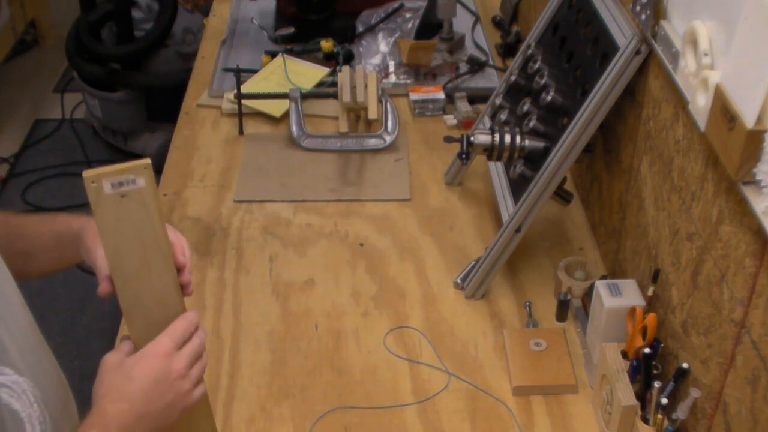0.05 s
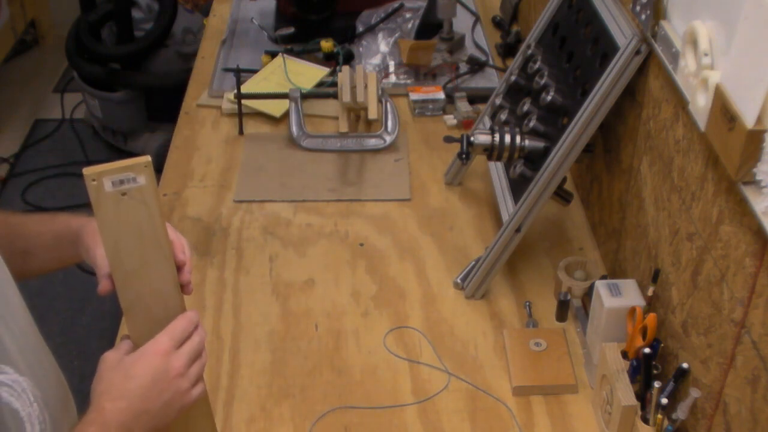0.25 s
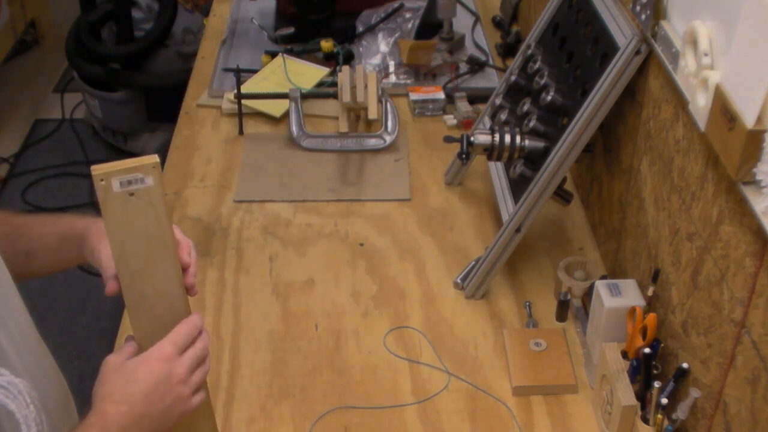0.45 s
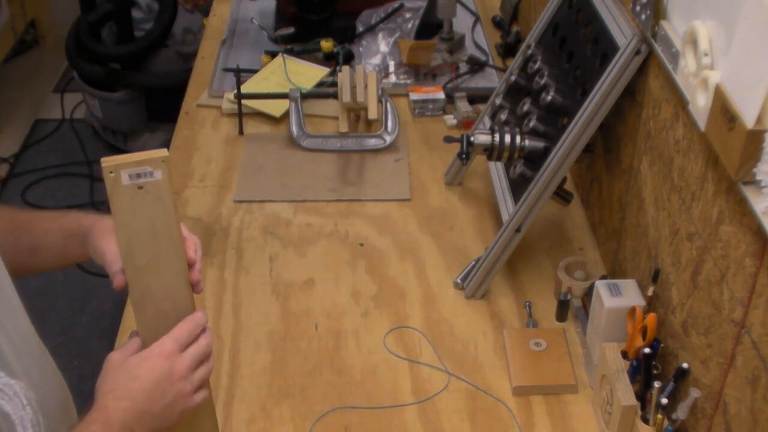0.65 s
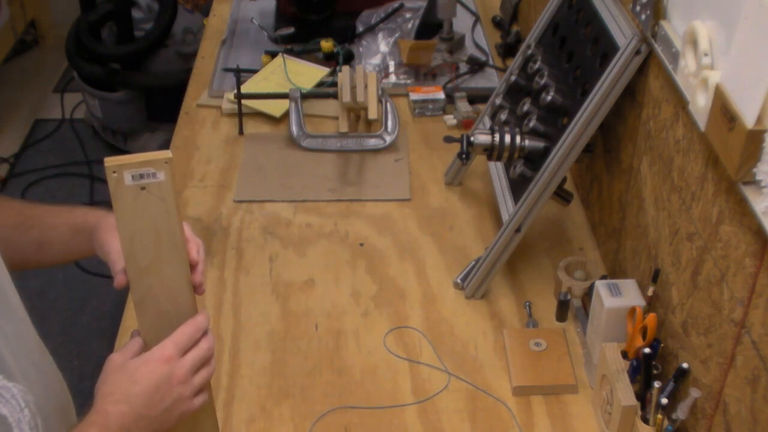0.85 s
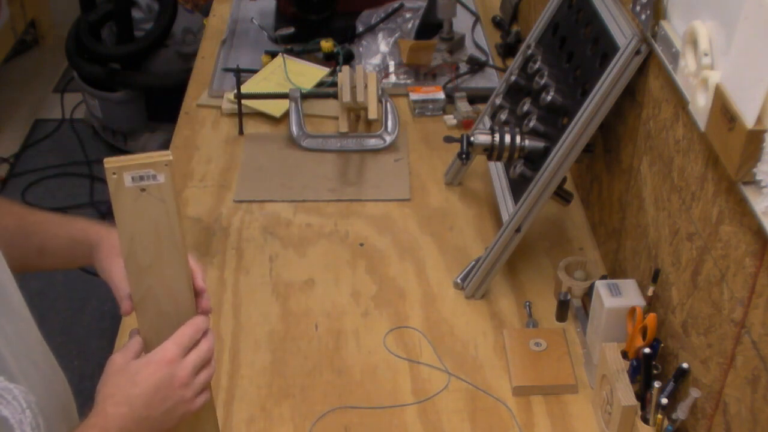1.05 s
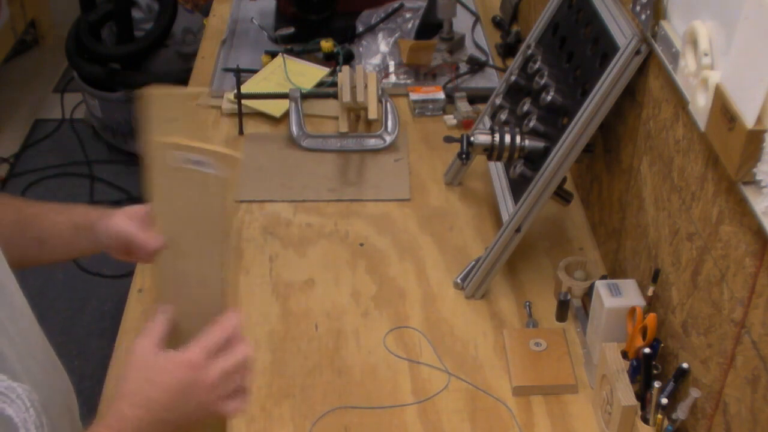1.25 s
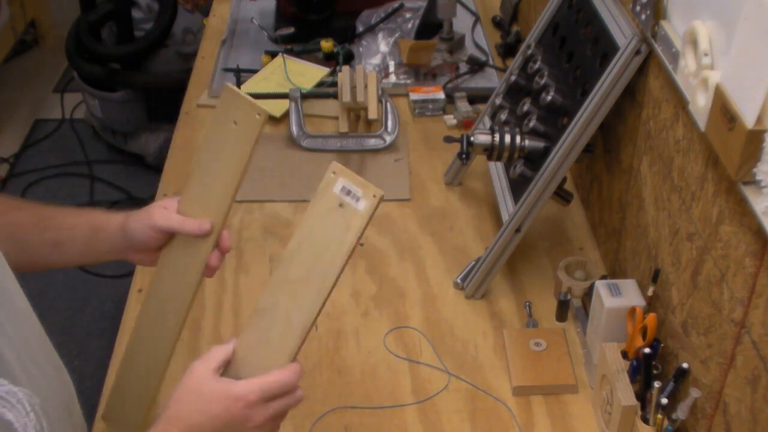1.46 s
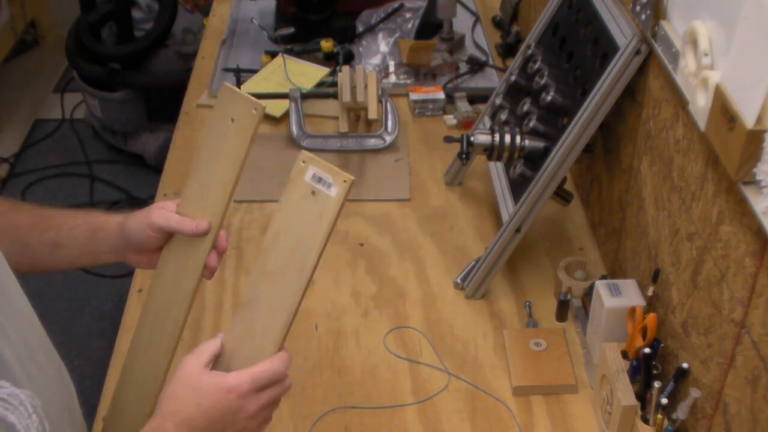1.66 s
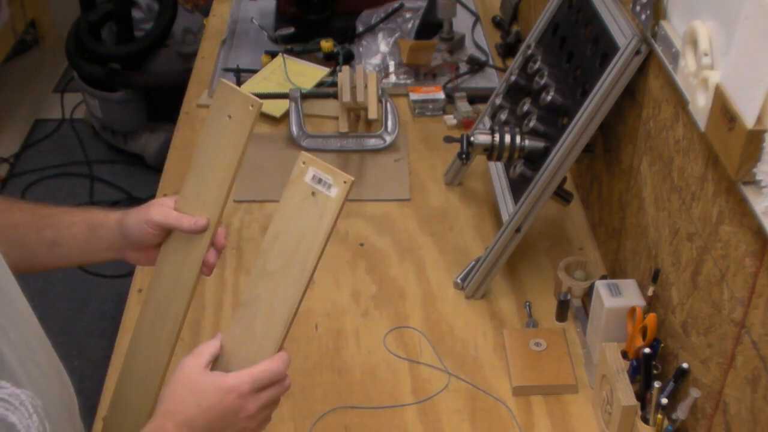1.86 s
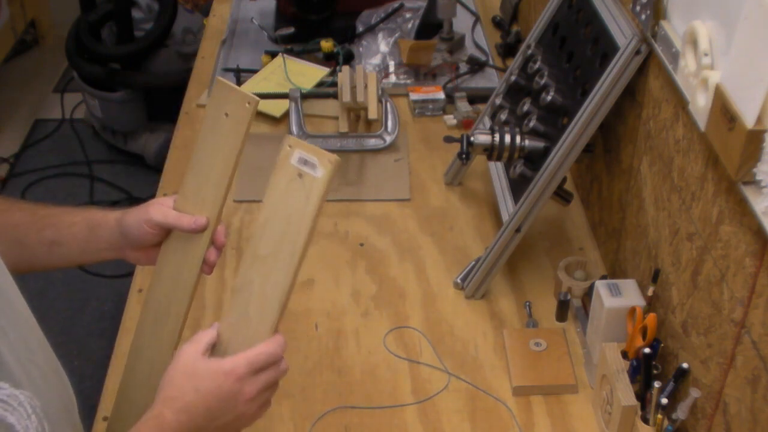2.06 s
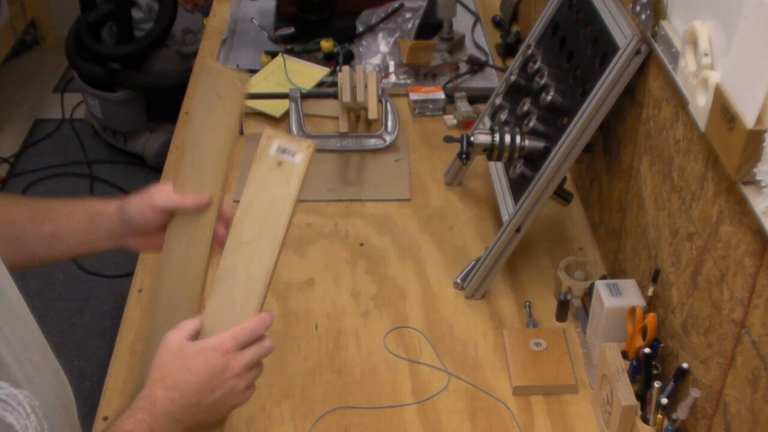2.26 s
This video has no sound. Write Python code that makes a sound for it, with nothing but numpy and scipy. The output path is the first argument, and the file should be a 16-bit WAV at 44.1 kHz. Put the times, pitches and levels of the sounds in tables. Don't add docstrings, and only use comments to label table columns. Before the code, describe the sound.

Two wooden boards clap hard at the very start, then two softer hollow knocks on a plywood bench follow; after a pause, they scuff and squeak faintly. Close microphone, small room, steady fan hum and hiss.

```python
import sys
import numpy as np
from scipy import signal
from scipy.fft import rfft, irfft, next_fast_len
from scipy.io import wavfile
from scipy.ndimage import map_coordinates

SR = 44100
rng = np.random.default_rng(int(sys.argv[2]) if len(sys.argv) > 2 else 0)


def invert_db(level):
    return 10 ** (np.asarray(level, dtype=float) / 20)


def wav_out(sig):
    wavfile.write(sys.argv[1], SR, np.round(np.clip(np.atleast_2d(sig).T, -1, 1) * 32767).astype(np.int16))


N = 101385
TIME = np.arange(N) / SR

# (frequency [Hz], correlation [1])
DIFFUSE_ALIKE = [(100, 0.9), (500, 0.98), (2000, 0.72), (8000, 0.067)]


def unit(x):
    return x / np.sqrt(np.mean(x ** 2) + 1e-20)


def noise(*shape):
    return rng.standard_normal(shape)


def along(points, hz):
    f, v = np.transpose(points)
    return np.interp(np.log(hz + 1), np.log(f + 1), v)


def filtered(x, response):
    m = next_fast_len(x.shape[-1] + 8192)
    hz = np.fft.rfftfreq(m, 1 / SR)
    return irfft(rfft(x, m) * response(hz), m)[..., :x.shape[-1]]


def high_passed(x, corner_hz):
    return filtered(x, lambda hz: (1j * hz / (corner_hz + 1j * hz)) ** 2)


def coloured(x, spectrum):
    return unit(filtered(x, lambda hz: invert_db(along(spectrum, hz))))


def paired(two, alike):
    def mid_side_gains(hz):
        angle = np.arccos(np.clip(along(alike, hz), -1, 1)) / 2
        return np.array([np.cos(angle), np.sin(angle)])

    mid, side = filtered(two, mid_side_gains)
    return np.array([mid + side, mid - side])


def ringing(modes, s, rise_s, bend=1):
    t = np.maximum(TIME - s, 0)
    ring = np.zeros(N)
    for k, (hz, db, t60) in enumerate(modes):
        decay = invert_db(db - 60 * (t / t60) ** bend)
        ring += (-1) ** k * decay * np.sin(2 * np.pi * hz * t)
    return ring * (1 - np.exp(-t / rise_s))


def swing(s, hz, time_s):
    t = np.maximum(TIME - s, 0)
    swell = (t / time_s / 2) ** 2 * np.exp(2 - t / time_s)
    return swell * np.sin(2 * np.pi * hz * t)


def dying(s, t60):
    return (TIME > s) * invert_db(-60 * np.abs(TIME - s) / t60)


def background():
    # (frequency [Hz], density [dB per Hz])
    hum_spectrum = [(25, -33), (60, -15.5), (160, -5), (225, -17.5), (330, -16.5), (450, -2), (800, -7),
                    (1100, -28.5)]
    air_spectrum = [(350, -42), (1200, 1), (2500, -4.5), (4200, -6), (5200, -6), (6300, -9), (7500, -107),
                    (9000, -56)]
    hiss_spectrum = [(200, -60), (1000, 10), (7000, 11), (12000, -33), (15700, 6)]
    # (frequency [Hz], width [Hz], rms level [dB])
    whine = [(60, 7, -62.5), (385, 47, -47.5), (505.5, 34, -51.5), (577, 11, -63.5), (661, 40, -56.5),
             (900, 30, -58), (1231, 2.7, -61), (5160, 320, -58)]
    steady = invert_db(-47.5) * coloured(noise(2, N), hum_spectrum)
    for centre, wide, db in whine:
        peak = lambda hz: 1 / (1 + ((hz - centre) / wide) ** 2) ** 1.2
        steady += invert_db(db) * unit(filtered(noise(2, N), peak))
    sway_db = 0.31 * map_coordinates(noise(40), [TIME * 12])
    air = invert_db(-50.5) * coloured(noise(2, N), air_spectrum)
    hiss = invert_db(-65) * coloured(noise(2, N), hiss_spectrum)
    return paired(steady * invert_db(sway_db) + air, DIFFUSE_ALIKE) + hiss


def fan_motor():
    motor_hz, rms_db = 267, -62
    return invert_db(rms_db) * np.sqrt(2) * np.sin(2 * np.pi * motor_hz * TIME)


def thud(s):
    # (frequency [Hz], density [dB per Hz])
    spectrum = [(220, -120), (320, -30), (400, -2.5), (650, -11), (900, -11.5), (1200, -42), (2200, -35),
                (3500, -120)]
    t60_s, rise_s = 0.19, 0.0021
    rise = 1 - np.exp(-np.abs(TIME - s) / rise_s)
    return coloured(noise(N), spectrum) * dying(s, t60_s) * rise


def boom(s):
    # (frequency [Hz], level [dB], t60 [s])
    bench = [(84, -4, 0.11), (152.4, -6.5, 0.16), (175.2, -10.5, 0.15), (205.7, -20.5, 0.21),
             (115.6, -20.5, 0.25)]
    return ringing(bench, s, rise_s=0.0033, bend=2.6)


def crack(s):
    # (frequency [Hz], density [dB per Hz])
    spectrum = [(600, -120), (1000, 6.5), (2500, -6.5), (6000, -15), (7500, -26.5), (10000, -19),
                (15500, -26), (16000, -120)]
    return coloured(noise(N), spectrum) * dying(s, t60=0.074)


def knocks():
    # (time [s], boards [dB], thud [dB], bench [dB], crack [dB])
    impacts = [
        (.0003, -9.5, -13, -15.5, -20),
        (0.1986, -18.5, -26, -24.5, -41),
        (0.36, -18, -23, -18.5, -33),
    ]
    # (frequency [Hz], time constant [s], level [dB])
    blows = [
        (397.7, 0.0033, -4),
        (518, 0.0013, -11.5),
        (478, 0.0012, -8),
    ]
    # (frequency [Hz], level [dB], t60 [s])
    clapped = [(381, 3.5, 0.086), (400, -10, 0.21), (453, -3.5, 0.15), (547.6, -5, 0.16),
               (635.3, -7.5, 0.18), (748, -14, .18), (817, -20.5, .15), (904, -33, 0.1), (1056, -36, 0.084),
               (1230, -31, .1), (1860, -35, 0.046), (2310, -42, .05)]
    loose = [(382, -2.5, 0.31), (398.5, -7.5, 0.18), (440, 1, 0.16), (522, -21, 0.067), (473.4, -21, 0.13),
             (554, -3.5, 0.13), (625, -10.5, 0.083), (780, -27, 0.091), (895, -16, 0.098), (1310, -36, .15),
             (1610, -19, .04), (2040, -22, 0.034)]
    tight = [(393.6, 1.5, 0.16), (418, 1, 0.13), (474, -26, 0.093), (540, -22, 0.095), (625, -8, 0.23),
             (658, -10, 0.11), (814, 1.5, 0.066), (807, -14, 0.17), (1185, -19, 0.17), (1720, -16, 0.037),
             (2094, -20, 0.034), (2460, -34, 0.036)]
    out = np.zeros(N)
    for impact, blow, modes in zip(impacts, blows, [clapped, loose, tight]):
        s, boards_db, thud_db, bench_db, crack_db = impact
        hz, blow_s, blow_db = blow
        out += invert_db(blow_db) * swing(s, hz, blow_s)
        out += invert_db(boards_db) * ringing(modes, s, rise_s=0.0013, bend=0.89)
        out += invert_db(thud_db) * thud(s)
        out += invert_db(bench_db) * boom(s)
        out += invert_db(crack_db) * crack(s)
    return out


def room(x):
    # (frequency [Hz], t60 [s])
    decay = [(80, 0.36), (500, 0.31), (2000, 0.38), (10000, 0.28)]
    hz, t, z = signal.stft(noise(2, SR // 2), SR, nperseg=256)
    tail = signal.istft(z * invert_db(-60 * t / along(decay, hz)[:, None]), SR, nperseg=256)[1]
    tail = paired(tail, DIFFUSE_ALIKE)
    tail = tail / np.linalg.norm(tail[0])
    delayed = np.pad(x, (200, 0))[None]
    return signal.fftconvolve(delayed, tail, axes=1)[:, :N]


def touches():
    # (time [s], frequency [Hz], time constant [s], level [dB])
    contacts = [
        (.0113, 400, 0.0029, -7),
        (0.0518, 385, 0.0035, -13),
    ]
    return sum(invert_db(db) * swing(s, hz, time_s) for s, hz, time_s, db in contacts)


def bumps():
    # (time [s], level [dB])
    contacts = [
        (.105, -33),
        (.985, -41),
    ]
    return sum(invert_db(db) * boom(s) for s, db in contacts)


def scuff():
    # (start [s], length [s], level [dB], brightness [dB per octave], edge [s])
    strokes = [
        (0.98, 0.13, -54.5, -2, .01),
        (1.118, 0.067, -45.5, -5.5, 0.007),
        (1.188, 0.021, -34, 3.5, 0.0036),
        (1.215, 0.028, -47, 9, 0.018),
        (1.256, 0.081, -52.5, -8.5, .005),
        (1.331, 0.084, -44.5, -2, 0.0065),
        (1.435, 0.044, -40, 0, 0.014),
        (1.485, 0.043, -51, 0, .015),
    ]
    # (frequency [Hz], density [dB per Hz])
    spectrum = [(900, -120), (1800, -4), (3500, 2.5), (6500, 4), (7600, -3), (11500, 2.5), (15500, -1),
                (16200, -120)]
    # (frequency [Hz], correlation [1])
    alike = [(2000, 0.87), (5000, 0.66), (9000, 0.075)]
    grains_per_s, grit_db, grit_share = 9000, 2, 0.4
    struck = rng.random((2, N)) < grains_per_s / SR
    grit = struck * invert_db(grit_db * rng.exponential(size=(2, N))) * noise(2, N)
    rough = grit_share * unit(grit) + (1 - grit_share) * noise(2, N)
    rough = paired(coloured(rough, spectrum), alike)
    step = lambda t, edge: (1 + np.tanh(t / edge)) / 2
    out = np.zeros((2, N))
    for s, length, db, tilt_db, edge in strokes:
        tilt = lambda hz: invert_db(tilt_db * np.log2((hz + 500) / 6000))
        stroke = step(TIME - s, edge) * step(s + length - TIME, edge)
        out += invert_db(db) * stroke * unit(filtered(rough, tilt))
    return out


def squeaks():
    # (peak [s], rise [s], fall [s], level [dB])
    slips = [
        (1.198, .008, 0.0064, -34.5),
        (1.263, 0.0026, 0.0087, -41),
        (1.349, 0.024, 0.0031, -36),
        (1.35, .005, 0.038, -41),
    ]
    # (frequency [Hz], width [Hz], level [dB])
    resonances = [
        [(4360, 92, 6), (3580, 170, -3), (5900, 180, -20), (2100, 370, -10)],
        [(3330, 600, 6), (4740, 400, 6), (6460, 480, -20)],
        [(2950, 63, -0.5), (4730, 86, -4.5), (6550, 62, -8), (5840, 89, -9)],
        [(2085, 30, 9), (3860, 170, -6)],
    ]
    out = np.zeros(N)
    for (peak, rise, fall, db), chirp in zip(slips, resonances):
        body = lambda f: sum(invert_db(g) * 1j * f * w / (c * c - f * f + 1j * f * w) for c, w, g in chirp)
        swelling = np.exp(-((TIME - peak) / rise) ** 2)
        fading = np.exp(-np.abs(TIME - peak) / fall)
        swell = np.where(TIME < peak, swelling, fading)
        out += invert_db(db) * swell * unit(filtered(noise(N), body))
    return out


def nudge():
    s = 2.272
    return invert_db(-33) * swing(s, 108, 0.011) + invert_db(-41) * thud(s + 0.006)


def scene():
    blows = high_passed(knocks() + touches() + bumps() + nudge(), 51)
    squeal = squeaks()
    sent = high_passed(blows + invert_db(-1.5) * squeal, 200)
    return blows + squeal + invert_db(-5) * room(sent) + scuff() + background() + fan_motor()


def roll_off(x):
    return signal.sosfilt(signal.butter(12, 15720, fs=SR, output="sos"), x)


def record(dry):
    # (frequency [Hz], left over right [dB])
    lean = [(40, 6), (150, 2.6), (500, 1.15), (3000, -0.7), (10000, .6)]
    top = 0.97
    halves = np.array([[0.5], [-0.5]])
    ports = filtered(dry, lambda hz: invert_db(along(lean, hz) * halves))
    ports = ports / (1 + np.abs(ports / top) ** 6) ** (1 / 6)
    return roll_off(ports)


dry = scene()
out = record(dry)
wav_out(out)
```